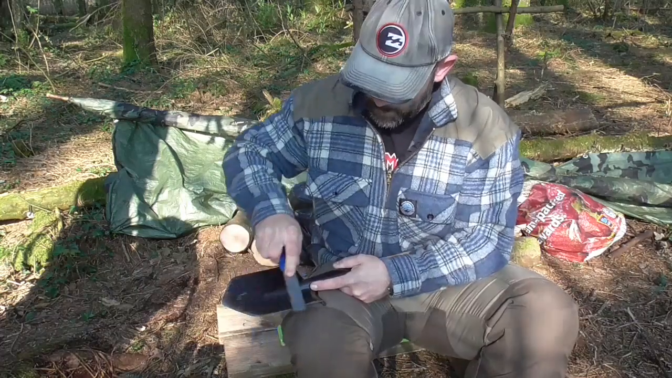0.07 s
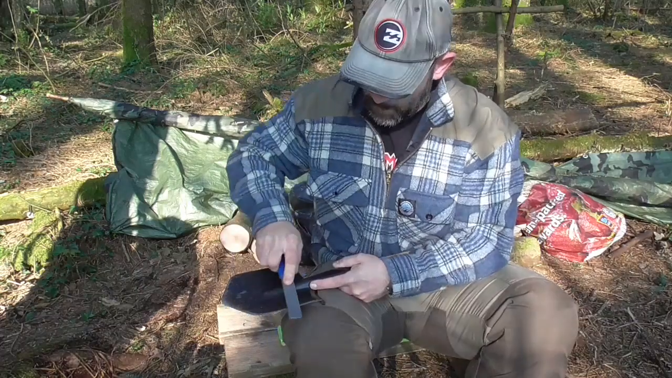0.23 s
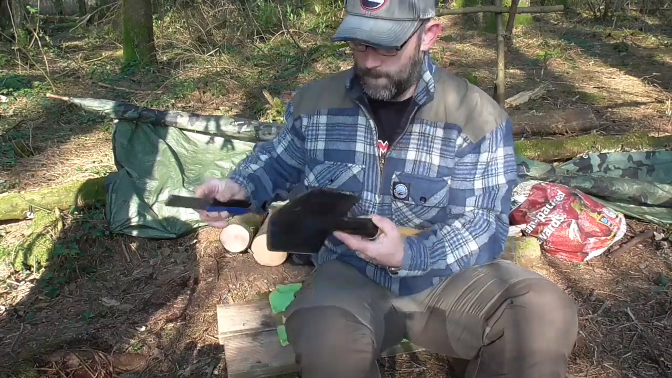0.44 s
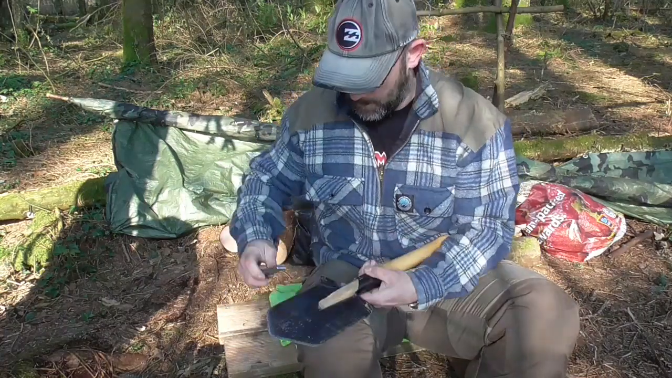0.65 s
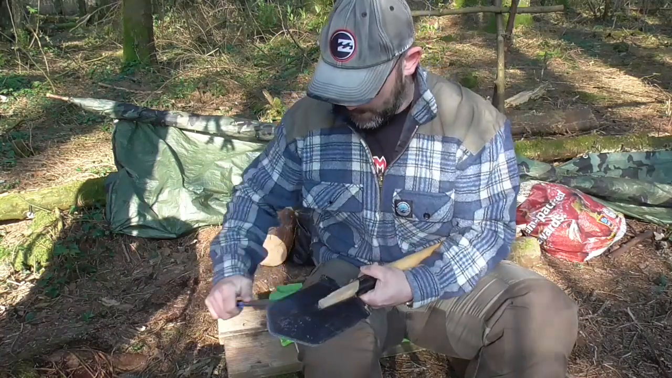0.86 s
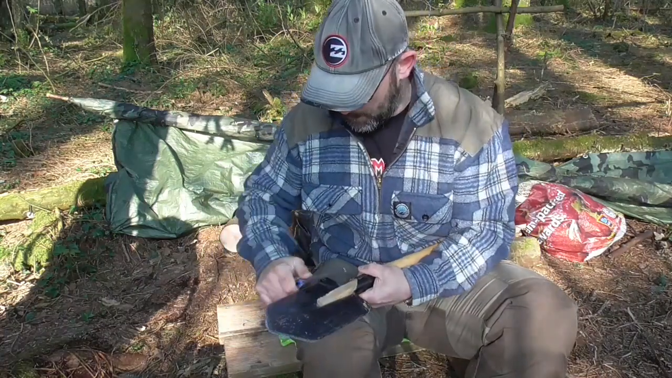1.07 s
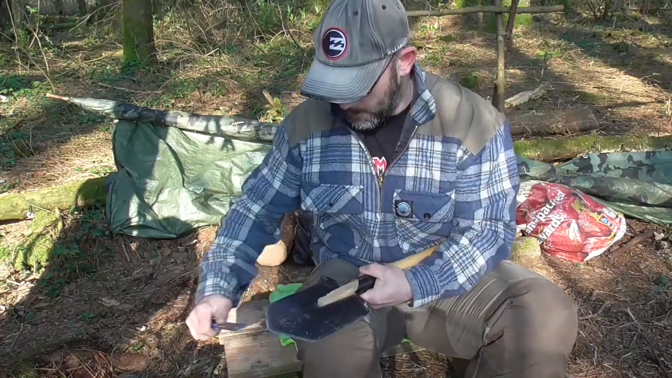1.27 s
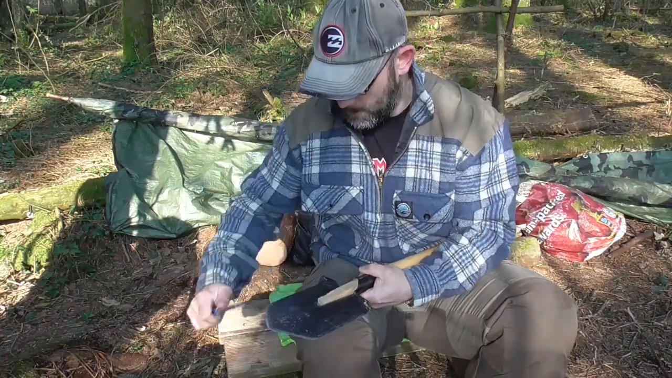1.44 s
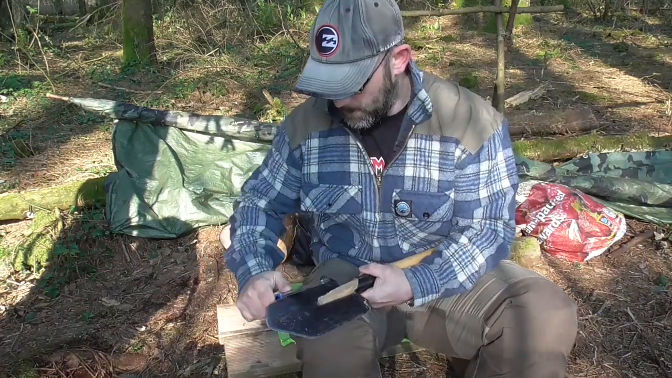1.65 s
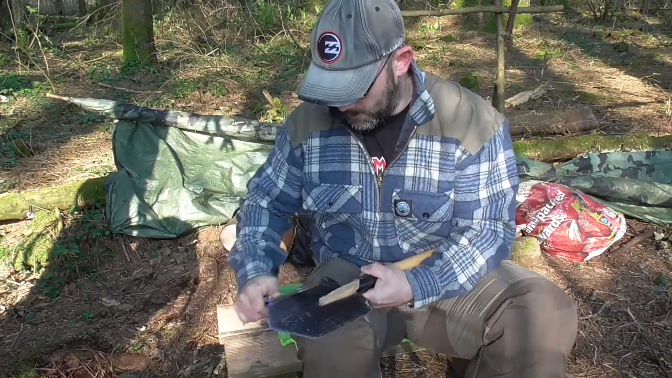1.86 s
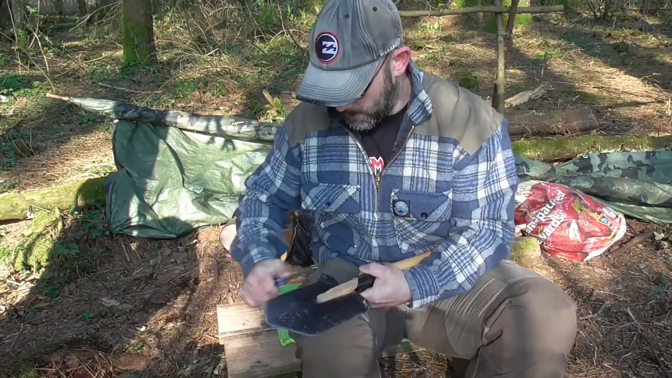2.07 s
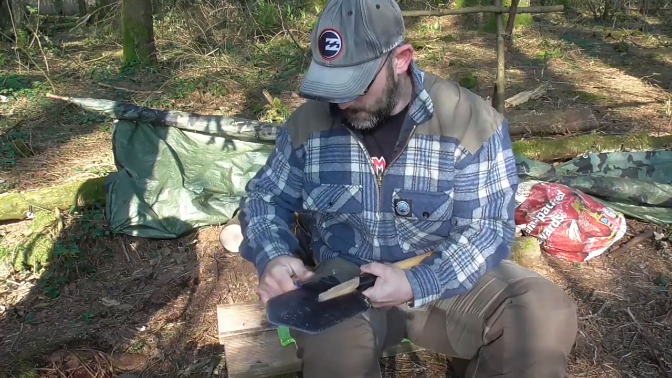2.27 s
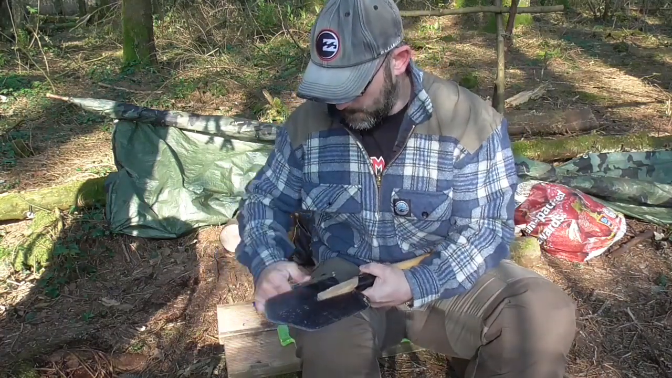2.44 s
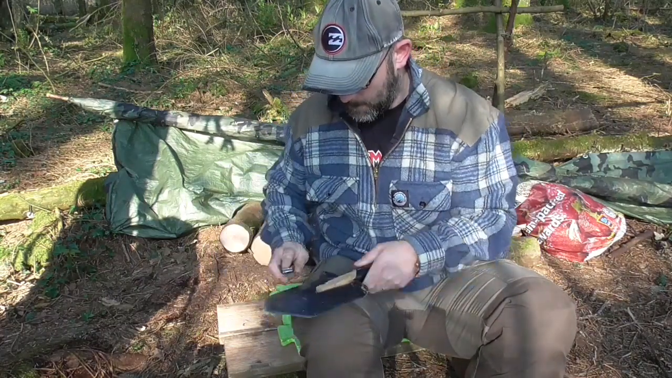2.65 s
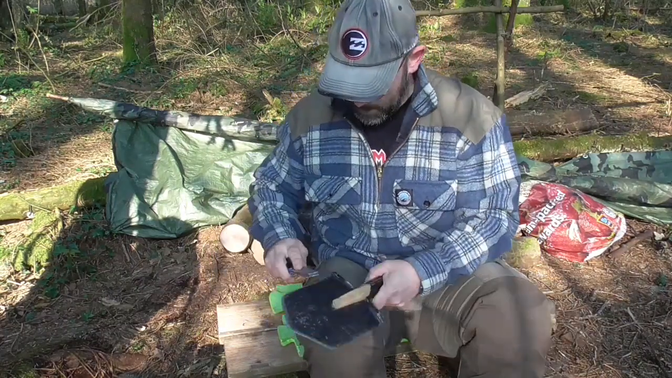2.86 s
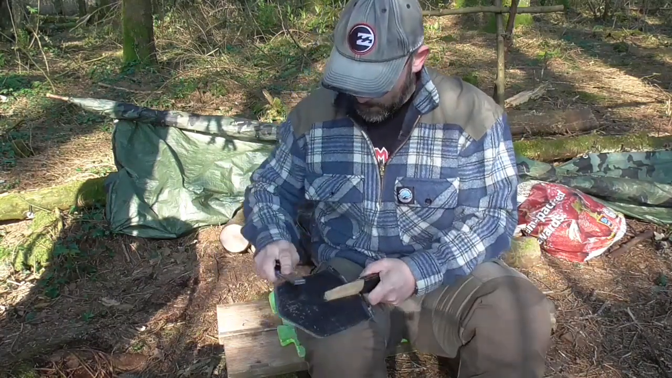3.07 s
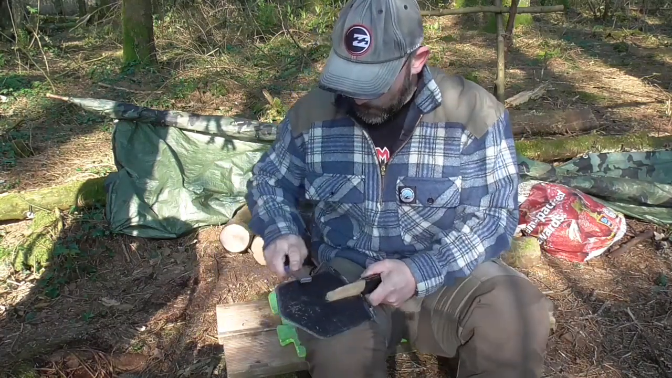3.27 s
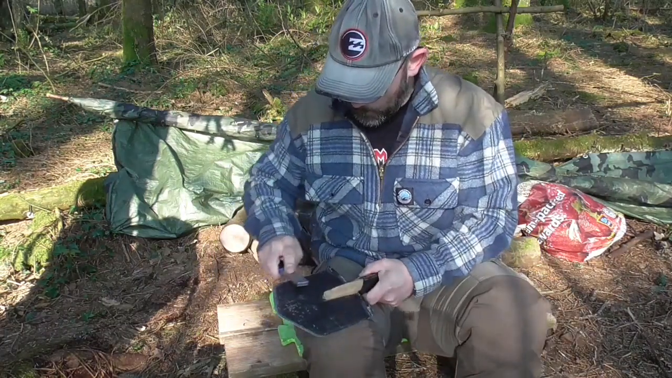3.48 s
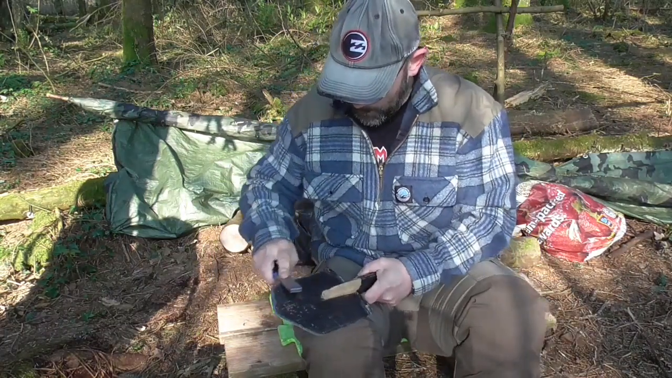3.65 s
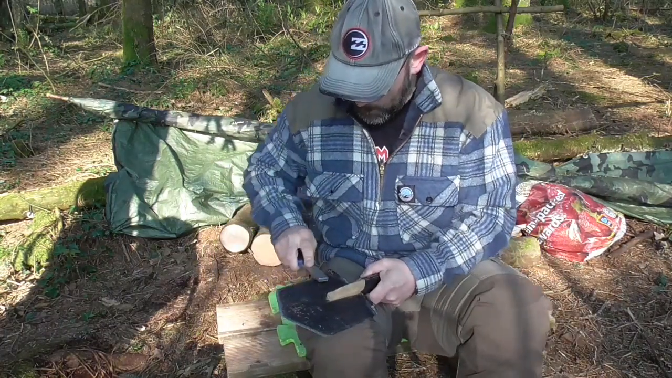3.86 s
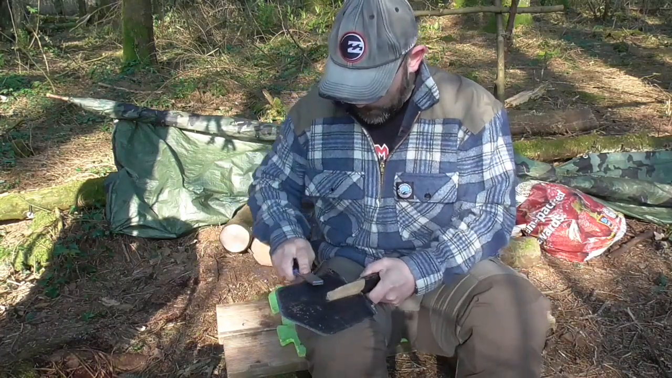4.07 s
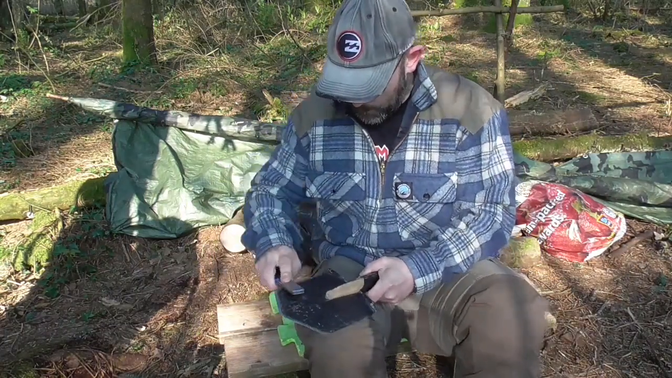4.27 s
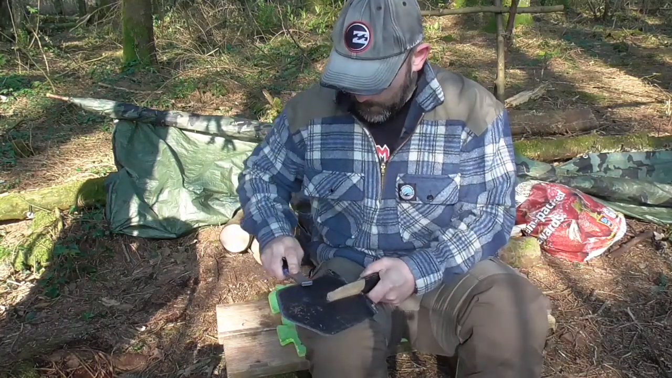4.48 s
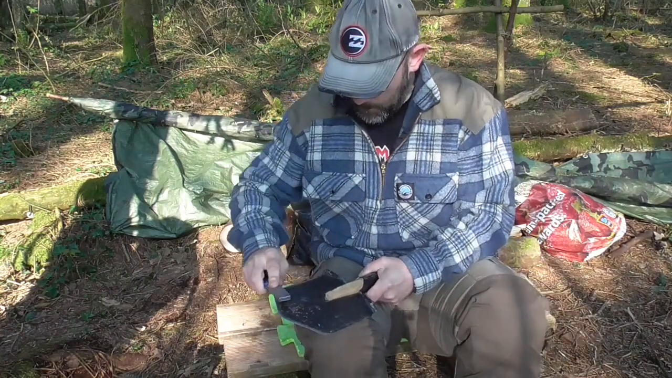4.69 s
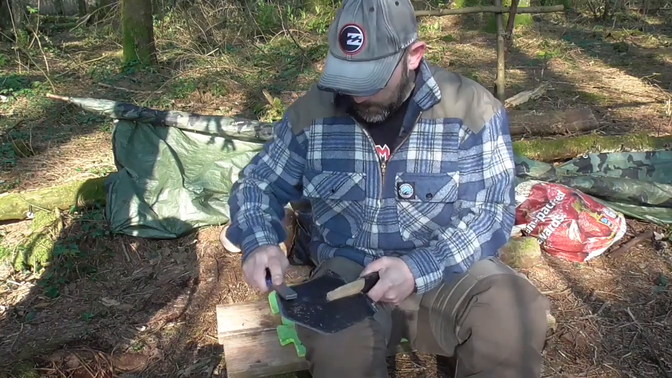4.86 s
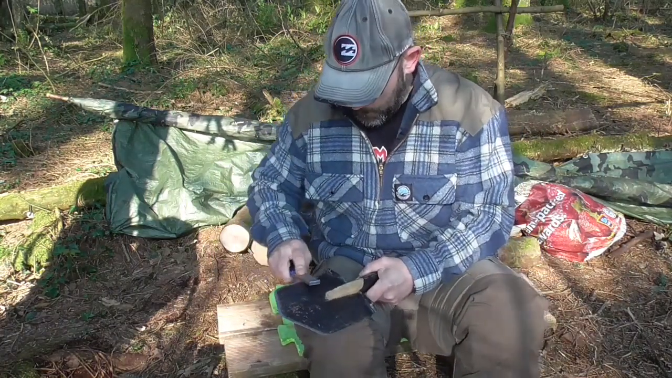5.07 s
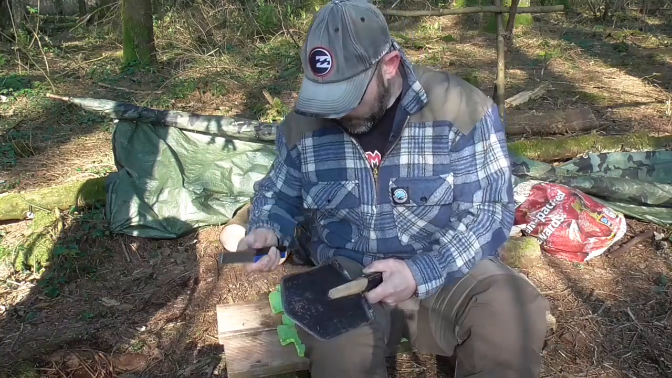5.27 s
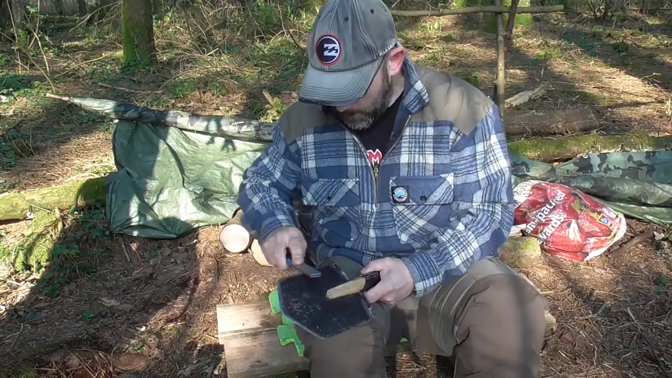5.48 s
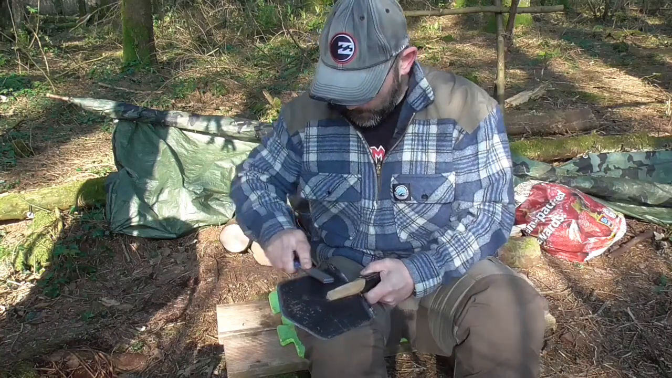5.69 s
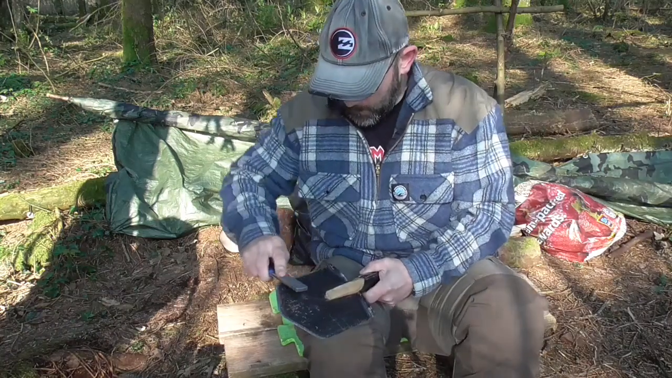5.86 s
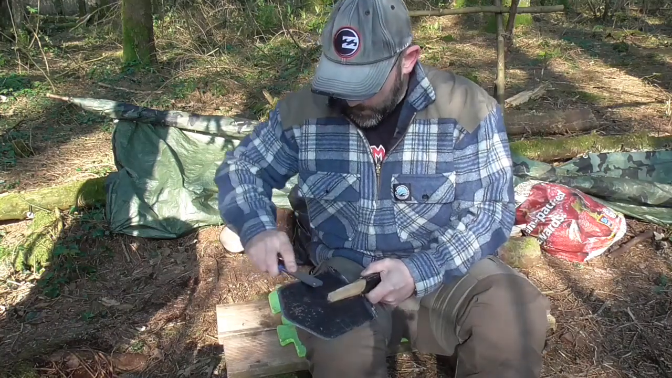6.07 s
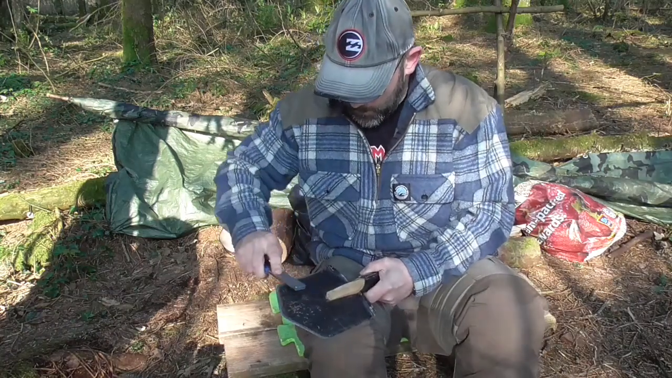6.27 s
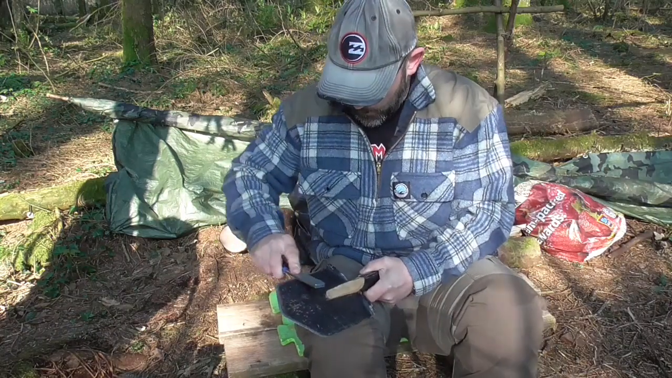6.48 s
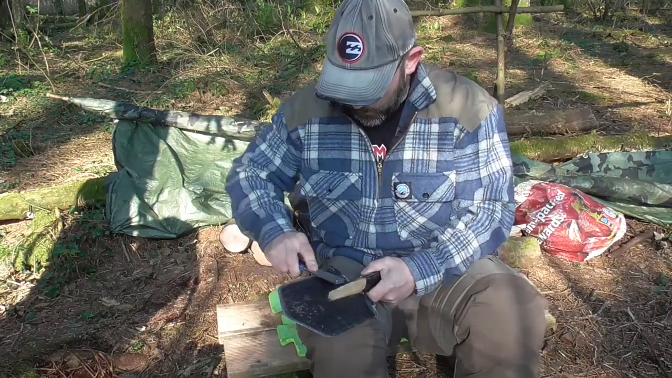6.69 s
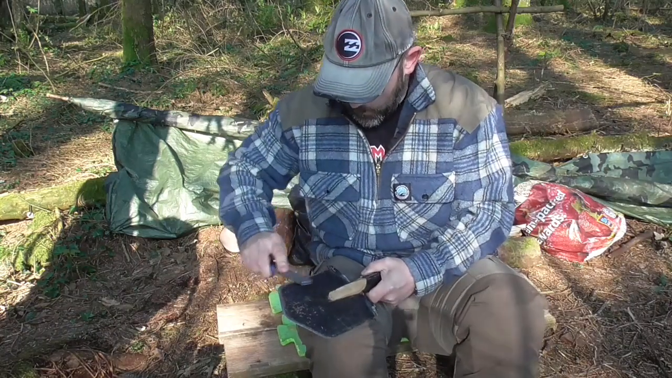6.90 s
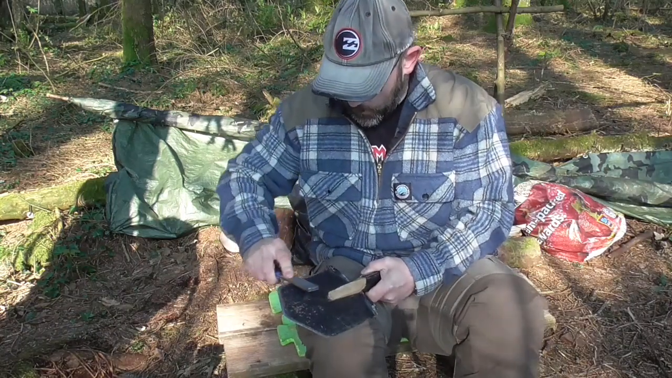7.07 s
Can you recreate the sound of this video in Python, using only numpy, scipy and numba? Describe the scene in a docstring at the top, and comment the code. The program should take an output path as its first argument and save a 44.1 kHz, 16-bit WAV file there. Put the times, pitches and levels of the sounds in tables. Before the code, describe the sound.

Outdoors among trees, close to the microphone, a gritty stone works a steel blade. From 0.06 to 0.4 s come three quick, bright scrapes, each begun by a small hard tap. A pause follows, with only soft airy hush, until about 0.87 s. Then twelve separate swipes run to 2.6 s, roughly seven a second: click, short hissing scrape, sometimes a catch at the end, and a thin, quickly fading blade ring. After a gap, a tap at 3.0 s starts hesitant rubs that settle into rapid to-and-fro rasping, about twenty-five strokes a second, with tiny snags, until 5.29 s. A brief break, then a tap at 5.57 s and continuous small circling, a fluttering, throbbing scrape to the end at about 7 s. Light wind thuds and flutters on the microphone, strongest around 2.3-2.9, 3.4 and 4.2-5.4 s. Nearly dry, faint woodland scatter.

```python
"""Outdoors in woodland, a diamond stone sharpens a steel blade held on a knee.
Single swipes start with a tap, scrape along the edge and leave the blade ringing; then the stone
rubs to and fro, then in quick small circles. Clumped grit noise drives the stone's damped modes;
fading sines make the blade's ring. Banded stereo noise makes the hush of the trees, a low rumble
of moving air and the light wind that flutters on the microphone ports."""
import sys
import numpy as np
from scipy import signal
from scipy.io import wavfile
from numba import njit

SR = 44100
rng = np.random.default_rng(int(sys.argv[2]) if len(sys.argv) > 2 else 0)


def put_to_file(sound):
    """Save the sound as 16-bit audio at rate SR, in the file named by the first command-line argument."""
    columns = np.atleast_2d(sound).T  # one column per channel
    safe = np.clip(columns, -1, 1)
    whole_steps = np.round(safe * 32767)
    wavfile.write(sys.argv[1], SR, whole_steps.astype(np.int16))


N = 314433
TIME = np.arange(N) / SR  # seconds

# single swipes: (landing [s], lift-off [s], attack [s], held level [dB], catch at the edge's end [dB],
# low blade ring before trim [dB], high blade ring before trim [dB])
SWIPES = [(0.059, 0.133, 0.035, -43, -1, -80, -82), (0.188, 0.276, 0.047, -41.5, 2.5, -80, -83),
          (0.34, 0.393, 0.019, -41, 1.5, -80, -82), (0.879, 0.967, 0.059, -33, -1.5, -56, -63),
          (1.045, 1.122, 0.022, -35, -4.5, -58.5, -80), (1.186, 1.254, .033, -38, 3, -55.5, -61),
          (1.324, 1.383, .028, -37.5, 5, -71, -66), (1.455, 1.537, 0.025, -43.5, 13, -56.5, -55),
          (1.622, 1.685, 0.01, -42.5, 15, -57, -55), (1.76, 1.822, 0.027, -40, 8.5, -58, -59),
          (1.91, 1.992, 0.021, -34, -1.5, -54, -67), (2.053, 2.135, 0.04, -35.5, 0.5, -57, -53.5),
          (2.211, 2.274, .016, -38.5, -0.5, -69, -63), (2.4, 2.475, 0.044, -37, -0.5, -63, -80),
          (2.548, 2.604, 0.013, -39, 1, -65, -58)]
# damped modes of the hand-held stone against the steel: (resting centre [Hz], width [Hz], level [dB])
STONE_MODES = [(2390, 174, -7), (3925, 195, 0), (5420, 330, 4), (6330, 180, -2.5), (7600, 1550, -8),
               (8590, 213, 6), (10140, 68, 8), (11600, 1250, -0.5), (12680, 84, 11), (14190, 530, 6.5),
               (14530, 220, 6.5), (14400, 220, -22)]
# the same before the blade is turned over: (resting centre [Hz], width [Hz], level [dB])
FIRST_GRIP_MODES = [(2300, 800, -15), (4000, 1400, -2), (5700, 270, 0), (6120, 190, 14), (8540, 1140, 4),
                    (10800, 290, -2), (12300, 530, 1.5), (14900, 540, -2)]
TURN_OVER_S = .6
# effort of circling without lifting: (time [s], level [dB], body against treble before trim [dB])
CIRCLE_EFFORT = [(5.578, -49, -5), (5.597, -37, -6.5), (5.82, -41.5, -7.5), (6.0, -41.3, -9),
                 (6.33, -40.5, -10.5), (6.5, -41, -11.5), (6.78, -41, -10.5), (7.13, -41.5, -9.5)]


def from_db(db):
    """Decibels to gain."""
    return np.exp(np.asarray(db) * (np.log(10) / 20))


def rms_one(x):
    """Scale to an rms of 1."""
    return x / np.sqrt(np.mean(x ** 2) + 1e-20)


def in_time(rows):
    """Every column of a curve, sample by sample."""
    s, *columns = np.transpose(rows)
    return [np.interp(TIME, s, c) for c in columns]


def at_hz(points, hz):
    """Read a spectrum on a log-frequency axis."""
    point_hz, values = np.array(points).T
    return np.interp(np.log(hz), np.log(point_hz), values)


def drift(rate_hz):
    """Smooth chance with a spread of 1: noise through two slow poles, made at a tenth of the sample rate."""
    r = np.exp(-20 * np.pi * rate_hz / SR)
    noise = rng.standard_normal(N // 10 + 4002)
    slow = signal.lfilter([1], [1, -2 * r, r * r], noise)[4000:]  # drop the filter's start-up
    return np.interp(np.arange(N) / 10, np.arange(len(slow)), rms_one(slow))


def band(x, low_hz, high_hz, order=2):
    """Butterworth band-pass."""
    edges_hz = [low_hz, min(high_hz, .48 * SR)]
    return signal.sosfilt(signal.butter(order, edges_hz, "band", fs=SR, output="sos"), x)


@njit
def resonate(x, angle, r):
    """Two-pole resonance with a moving centre (radians per sample), gain 1 on top."""
    y = np.zeros(len(x))
    for i in range(2, len(x)):
        driven = (1 - r * r) / 2 * (x[i] - x[i - 2])
        y[i] = driven + 2 * r * np.cos(angle[i]) * y[i - 1] - r * r * y[i - 2]
    return y


def mode(x, hz, width_hz):
    """One damped mode, its centre steady or moving."""
    return resonate(x, 2 * np.pi * hz / SR * np.ones(len(x)), np.exp(-np.pi * width_hz / SR))


def air_noise(colour, likeness, patchy_db, flutter_hz, count):
    """Stereo noise in bands, each with its own flutter and left-right correlation; rms 1."""
    mid, side = np.zeros((2, N))
    together = drift(flutter_hz)
    edges_hz = np.geomspace(25, colour[-1][0], count + 1)
    white = rng.standard_normal((2, 2, N))
    for k, (low_hz, high_hz) in enumerate(zip(edges_hz, edges_hz[1:])):
        hz = np.sqrt(low_hz * high_hz)
        alike = np.clip(at_hz(likeness, hz), -1, 1)
        flutter = from_db(patchy_db * (together + drift(flutter_hz))) if patchy_db else 1
        noise = band(white[k % 2], low_hz, high_hz) * flutter * from_db(at_hz(colour, hz))
        mid += noise[0] * np.sqrt(1 + alike)
        side += noise[1] * np.sqrt(1 - alike)
    return rms_one(np.array([mid + side, mid - side]))


def hush():
    """The trees' hush: steady-grained noise that slowly changes level."""
    # (time [s], level [dB])
    hush_level = [(0, -56), (.85, -57), (1.05, -59), (1.41, -64.5), (1.75, -63), (2.05, -59.5), (2.5, -59),
                  (2.8, -57.5), (4, -60.5), (5.4, -58), (7.13, -61.5)]
    # (frequency [Hz], level [dB per Hz])
    hush_colour = [(30, -15), (70, -23), (160, -0.5), (350, 2.5), (700, -0.5), (1200, 1.5), (1700, 1),
                   (2600, 2.5), (4000, -2.5), (5600, -6), (7200, -28), (9000, -14), (11000, -16),
                   (13000, -11.5), (16500, -19)]
    # left-right likeness: (frequency [Hz], correlation [-1 to 1])
    hush_likeness = [(60, -0.6), (200, -0.015), (600, 0.088), (1300, 0.61), (4000, 0.46), (15000, .4)]
    noise = air_noise(hush_colour, hush_likeness, patchy_db=0, flutter_hz=8, count=16)
    return from_db(in_time(hush_level)[0]) * noise


def rumble():
    """Moving air rumbles: patchy low noise, somewhat opposed between the sides."""
    # (time [s], level [dB])
    rumble_level = [(0, -80), (.7, -92), (1.2, -78), (2.5, -81), (3.5, -78), (4.4, -68.5), (5.3, -72),
                    (6.3, -70.5), (7.13, -74)]
    # (frequency [Hz], level [dB per Hz])
    rumble_colour = [(30, -11), (60, -9), (110, -1), (170, -6), (260, -7)]
    noise = air_noise(rumble_colour, [(30, -0.25), (200, -0.43)], patchy_db=3.6, flutter_hz=11, count=3)
    return from_db(in_time(rumble_level)[0]) * noise


def wind():
    """A swelling breeze with short bell-shaped buffets on top pushes the two ports in opposite senses."""
    # strength of the breeze on the ports: (time [s], level [dB])
    breeze_level = [(0, -59), (.75, -75.5), (1.55, -62), (2.15, -57.5), (2.35, -48.5), (2.62, -48.5),
                    (2.92, -47), (3.18, -70), (3.45, -52.5), (3.9, -60), (4.08, -62.5), (4.2, -45.5),
                    (4.55, -46.5), (5.05, -49), (5.35, -46), (5.85, -51.5), (6.6, -55), (7.13, -50.5)]
    # (frequency [Hz], level [dB per Hz])
    breeze_colour = [(30, -44), (70, -29), (150, -11.5), (280, 1), (500, 2.5), (760, -7), (1100, -14.5),
                     (1600, -20.5), (3400, -48), (6000, -60)]
    # buffets: (time [s], peak level [dB], standard deviation of the bell [s])
    gusts = [(.48, -51, 0.0091), (1.866, -46.5, 0.017), (2.3, -44, 0.013), (2.453, -44.5, .016),
             (2.545, -33.5, 0.0069), (2.617, -41, 0.027), (2.795, -38.5, 0.015), (3.382, -36, 0.022),
             (3.716, -49.5, 0.017), (4.548, -41.5, .018), (4.636, -40.5, 0.014), (5.272, -41.5, 0.029),
             (6.08, -47, 0.0095), (6.65, -44.5, 0.0078)]
    # a buffet rings the ports in one broad hump: (frequency [Hz], level [dB per Hz])
    gust_colour = [(30, -43), (120, -23), (220, -13.5), (330, 0), (500, 1.5), (700, -5.5), (1100, -15),
                   (1800, -30), (4000, -50)]
    breeze = from_db(in_time(breeze_level)[0]) * air_noise(
        breeze_colour, [(50, -0.21), (300, -0.85), (1500, -0.59)], patchy_db=3.0, flutter_hz=28.7, count=11)
    bells = sum(from_db(db) * np.exp(-.5 * ((TIME - s) / spread_s) ** 2) for s, db, spread_s in gusts)
    buffets = bells * air_noise(
        gust_colour, [(50, -0.62), (400, -0.82), (1500, -0.68)], patchy_db=1.5, flutter_hz=38, count=12)
    return breeze + buffets


def taps(delay_s=.0017, contact_s=0.0023, ring_share=1.06, energy_s=0.0015, crack_db=-9, low_db=-4,
         low_loss=0.67, side_db=-12):
    """The landing stone gives one sharp snap, chatters for a millisecond or two and rings briefly."""
    # the stone lands on the edge: (time before the delay [s], level [dB], knock above that level [dB],
    # clang of the middle modes above that level [dB])
    landings = [(0.058, -30.5, -13, -3.5), (0.194, -30.5, -32, -4), (0.337, -30, -16, 0.5),
                (0.869, -31.5, -37, -7), (1.045, -30.5, -16.5, -1), (1.189, -27.5, -7, -2),
                (1.325, -31.5, -9, 3), (1.461, -30.5, -10.5, 2), (1.613, -34.5, -24, 11.5),
                (1.625, -33.5, -14, 8.5), (1.756, -33.5, -22, 7), (1.912, -34, -20, 2),
                (2.061, -31, -12, -2), (2.206, -28, -6, 0), (2.403, -30.5, -18, -3), (2.55, -27, -5, -11),
                (2.988, -33, -21, -2), (5.565, -30, -13, -0.5)]
    out, t = np.zeros(N), TIME[:SR // 40]
    blow = signal.unit_impulse(len(t))
    snap, crack = rms_one(band(blow, 340, 2200)), rms_one(band(blow, 5300, 17000))
    for s, level, knock, clang in landings:
        chatter = rng.choice([-1, 1], len(t)) * np.exp(-(t / contact_s) ** 1.6)
        modes = FIRST_GRIP_MODES if s < TURN_OVER_S else STONE_MODES
        rings = []
        for hz, width_hz, db in modes:
            struck_hz = hz * (1 + 0.024 * rng.normal())
            # a blow is softer than grit, so the highest modes get less of it
            softness = min(1, 8600 / hz) ** 3
            rings.append(from_db(db) * mode(chatter, struck_hz, width_hz * ring_share) * softness)
        rings = np.array(rings)
        # groups 1 to 3 are low, middle and high; modes under 3000 Hz stay silent
        group = np.searchsorted([3000, 4700, 7200], [row[0] for row in modes])
        hit = from_db(knock) * snap - from_db(crack_db) * crack
        # a landing that favours the middle modes starves the low one
        for k, share_db in enumerate((low_db - low_loss * max(clang, 0), clang, 0)):
            hit += from_db(share_db) * rms_one(rings[group == k + 1].sum(axis=0))
        at = round((s + delay_s) * SR)
        # the level holds for energy_s worth of sound, not for the whole window
        out[at:at + len(t)] += from_db(level) * hit * np.sqrt(energy_s / t[-1])
    # the bounce off the blade's face arrives from the side
    return out + from_db(side_db) * np.roll(out, SR // 900) * [[1], [-1]]


def swipes(attack_power=1.55, catch_lead_s=0.0027, catch_s=0.011, release_s=0.0016, brightens_db=3.5):
    """Each swipe builds pressure, holds, swells or eases just before lift-off and lets go, moving one way."""
    strength, place = np.zeros((2, N))
    for start, end, attack_s, level, catch, _, _ in SWIPES:
        on = slice(int(start * SR), int((end + .03) * SR))
        t, length = np.maximum(TIME[on] - start, 0), end - start
        attack = np.minimum(t / attack_s, 1) ** attack_power
        release = np.exp(-np.maximum(t - length, 0) / release_s)
        catching = catch * np.exp(-((t - length + catch_lead_s) / catch_s) ** 2)
        strength[on] = attack * release * from_db(level + catching)
        place[on] = 1.17 * np.minimum(t / length, 1) - 1
    # a swipe brightens towards its end
    return strength, -brightens_db * place, place


def grit(grains_per_s, size_db, chatter_db):
    """Diamond grains catch the steel: dense clicks of uneven size, coming in clumps."""
    caught = rng.random(N) < grains_per_s / SR
    sizes = from_db(size_db * np.minimum(rng.exponential(1, N), 3)) * rng.standard_normal(N)
    clumps = from_db(chatter_db * np.clip(drift(105), -2, 2))
    return rms_one(caught * sizes * clumps)


def notched(x):
    """Five fixed narrow notches thin the scrape."""
    # notches: (centre [Hz], width [Hz])
    notches = [(3160, 435), (4640, 270), (7800, 270), (9330, 250), (12180, 110)]
    for hz, width_hz in notches:
        x = signal.lfilter(*signal.iirnotch(hz, hz / width_hz, fs=SR), x)
    return x


def scrape(modes, motion, hiss_db, slide, wander, glide_db, pressure_db, low_db, glide_hz=11700,
           glide_span=0.157, glide_width_hz=300, side_db=-12.5):
    """Grit drives the stone's modes, which shift as the contact moves; a little hiss comes off the edge."""
    strength, body_db, place = motion
    force = grit(grains_per_s=17000, size_db=0.5, chatter_db=1.83)
    body, treble = np.zeros((2, N))
    for hz, width_hz, db in modes:
        moving_hz = hz * (1 + slide * place + wander * drift(34))
        ringing = from_db(db) * mode(force, moving_hz, width_hz)
        if hz < 7000:
            # the grip sets how far the lowest modes ring
            body += ringing * from_db(low_db * (hz < 4700))
        else:
            treble += ringing
    # the length of stone beyond the contact sings in a thin, widely gliding band
    edge = grit(grains_per_s=8000, size_db=3.0, chatter_db=4.0)
    treble += from_db(glide_db) * mode(edge, glide_hz * (1 + glide_span * place), glide_width_hz)
    hiss = from_db(hiss_db) * band(edge, 2170, 18500)
    # firm pressure favours the lower modes, light fast contact the treble
    weight = from_db(body_db + pressure_db)
    ringing_stone = (weight * rms_one(body) + rms_one(treble)) / np.sqrt(1 + weight ** 2)
    sound = notched(ringing_stone + hiss)
    # a quieter copy, shifted by a thirtieth of a second and opposite left and right, widens the scrape
    widening = from_db(side_db) * np.roll(sound, SR // 30) * [[1], [-1]]
    return strength * (sound + widening)


def blade(low_db=11, high_db=6, build_s=0.0076):
    """Freed from the stone, the blade rings on in its own modes, each a fading sine."""
    # free blade: (frequency [Hz], level [dB], time to fade by 60 dB [s])
    blade_modes = [(3720, -2, 0.071), (4505, 2.5, 0.13), (5895, -7, 0.17), (7430, -2.5, 0.35),
                   (8603, 2, 0.053), (10500, 18, 0.046), (12400, 0, 0.073)]
    # the last rub also leaves the blade ringing: (time [s], low ring before trim [dB], high ring before trim [dB])
    last_lift = (5.283, -82, -67)
    out, t = np.zeros(N), TIME[:SR]
    lifts = [(end, low, high) for _, end, *_, low, high in SWIPES] + [last_lift]
    for s, low, high in lifts:
        at = round((s - build_s) * SR)
        for hz, db, t60 in blade_modes:
            level = high + high_db if hz > 7000 else low + low_db
            envelope = from_db(level + db - 60 * t / t60) * np.minimum(t / build_s, 1)
            out[at:at + SR] += envelope * np.sin(2 * np.pi * (hz * t + rng.random()))
    return out


def snags(low_hz=3700, width_hz=220, low_db=-7, rest_db=-18, rise_s=0.0026, delay_s=0.00118):
    """A snag is a few milliseconds of harder grit that wakes the stone's low mode."""
    # the stone snags on the edge: (time before the delay [s], low mode before trim [dB], rest before trim [dB])
    snag_hits = [(0.961, -35, -46), (3.3727, -62, -32), (4.5715, -51, -32), (4.652, -49.5, -44),
                 (4.734, -51, -46), (4.807, -42.5, -37), (4.895, -51, -29.5), (4.972, -48.5, -43)]
    out, t = np.zeros(N), TIME[:SR // 25]
    swell = t / rise_s * np.exp(1 - t / rise_s)
    for s, low, rest in snag_hits:
        force = rng.standard_normal(len(t)) * swell
        ring = mode(force, low_hz, width_hz)
        rasp = sum(from_db(db) * mode(force, hz, width) for hz, width, db in STONE_MODES[2:])
        at = round((s + delay_s) * SR)
        out[at:at + len(t)] += from_db(low + low_db) * rms_one(ring)
        out[at:at + len(t)] += from_db(rest + rest_db) * rms_one(rasp)
    return out


def rubs(push_db=0.47, spread_db=1, skew=0.72, turn_share=.1, stop_sharpness=1.1, colour_db=1.5):
    """To and fro: the stone nearly stops at every turn, and the contact travels out and back."""
    # pace, which settles at about 25 strokes a second: (time [s], strokes made [count])
    rub_pace = [(3.0, 0), (3.022, 1), (3.075, 2), (3.234, 4), (3.281, 5), (3.619, 13), (3.979, 22),
                (4.316, 31), (4.6, 38), (5.287, 55)]
    # effort, after a light first touch: (time [s], level [dB], body against treble before trim [dB])
    rub_effort = [(3.03, -44, 5), (3.065, -60, 0), (3.09, -40.5, -10.5), (3.3, -40, -4),
                  (3.45, -41.5, -8.5), (3.95, -41, -10), (4.08, -44, -10), (4.22, -41, -7.5),
                  (4.75, -42, -8.5), (4.89, -42.5, -6.5), (5.25, -40, -6)]
    made, = in_time(rub_pace)
    level, body_db = in_time(rub_effort)
    stroke = made.astype(int)
    pushing = 2 * (stroke % 2) - 1  # 1 on a push, -1 on a pull
    swing = np.pi * (made - stroke) ** skew  # speed peaks early in each stroke
    speed = turn_share + np.abs(np.sin(swing)) ** stop_sharpness
    # pushes are stronger than pulls, and no two strokes are alike in level or colour
    harder, duller = rng.standard_normal((stroke[-1] + 1, 2))[stroke].T
    uneven_db = push_db * pushing + spread_db * harder
    on = (TIME > rub_pace[0][0]) & (TIME < rub_pace[-1][0])
    strength = on * from_db(level + uneven_db) * speed / np.sqrt(np.mean(speed[on] ** 2))
    return strength, body_db + colour_db * duller, -pushing * np.cos(swing)


def circles(throb_hz=30.9, throb_db=1.5, throb_wander=0.095):
    """Small circles: the stone never stops, its scrape throbs twice a lap."""
    level, body_db = in_time(CIRCLE_EFFORT)
    lap = np.pi * np.cumsum(throb_hz * (1 + throb_wander * drift(3.1))) / SR  # radians
    return from_db(level + throb_db * np.cos(2 * lap)), body_db, np.sin(lap)


def hand():
    """Strength, body against treble (dB) and place of contact (-1 to 1): for swipes, then for quick work."""
    quick = np.where(TIME < CIRCLE_EFFORT[0][0], rubs(), circles())
    return swipes(), quick


def woodland(x, echo_db, t60):
    """Direct sound and a faint scatter from the ground and the trunks."""
    t = TIME[:SR // 4]
    scatter = rng.standard_normal((2, len(t))) * from_db(-60 * t / t60) * (t > .003)
    echoes = signal.oaconvolve(x, scatter / np.linalg.norm(scatter[0]), axes=1)[:, :N]
    # the direct sound leans slightly to the right
    return x * from_db([[-.25], [.25]]) + from_db(echo_db) * echoes


def scene():
    """Stone on steel among the trees, with wind on the microphone."""
    air = hush() + rumble() + wind()
    slow, quick = hand()
    first = scrape(FIRST_GRIP_MODES, slow, hiss_db=-4.0, slide=0.022, wander=0.0092, glide_db=-12,
                   pressure_db=-5, low_db=1.0)
    # a long swipe holds the stone steady; in quick rubbing it rocks, and its modes wander
    swiping = scrape(STONE_MODES, slow, hiss_db=-6, slide=0.062, wander=0.021, glide_db=4,
                     pressure_db=-4.5, low_db=-1.5)
    rubbing = scrape(STONE_MODES, quick, hiss_db=-10, slide=0.044, wander=0.041, glide_db=6.0,
                     pressure_db=0.1, low_db=-.5)
    scraping = np.where(TIME < TURN_OVER_S, first, swiping) + rubbing
    steel = scraping + taps() + blade() + snags()
    # the air is a little louder on the right
    return woodland(steel, echo_db=-14.5, t60=0.048) + air * from_db([[-.45], [.45]])


def record(dry):
    """The top is cut steeply by an elliptic low-pass at 15650 Hz."""
    return signal.sosfilt(signal.ellip(10, .2, 70, 15650, fs=SR, output="sos"), dry)


dry = scene()
out = record(dry)
put_to_file(out)
```